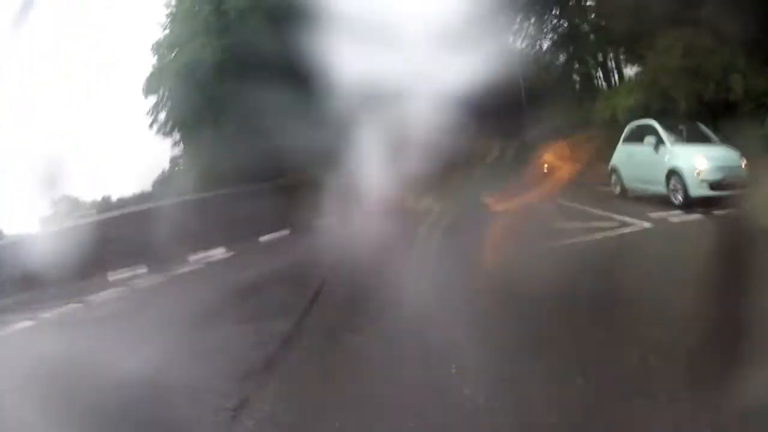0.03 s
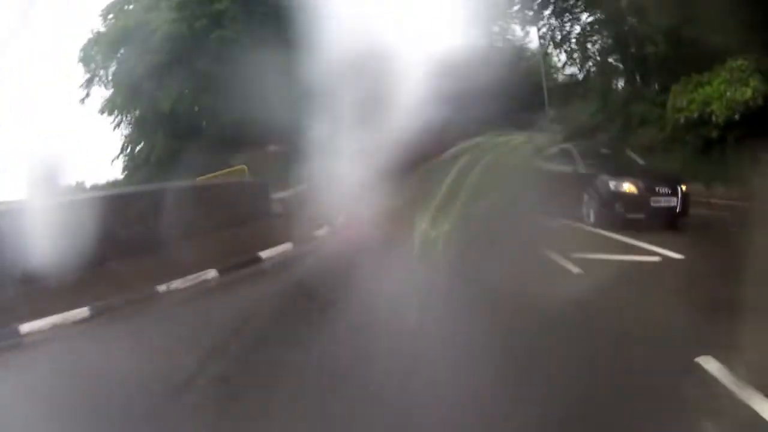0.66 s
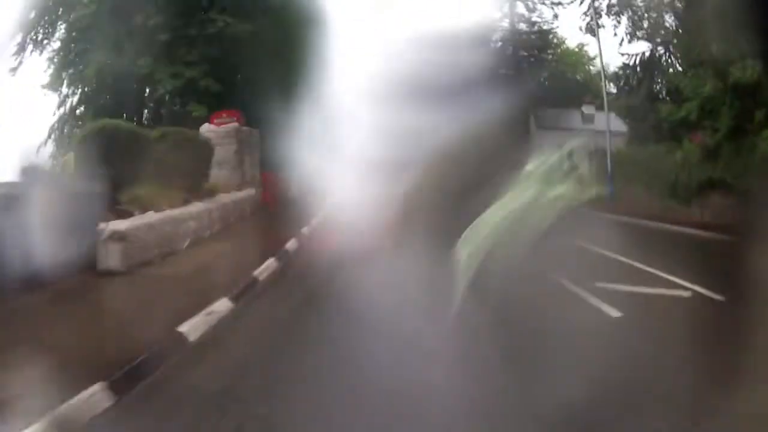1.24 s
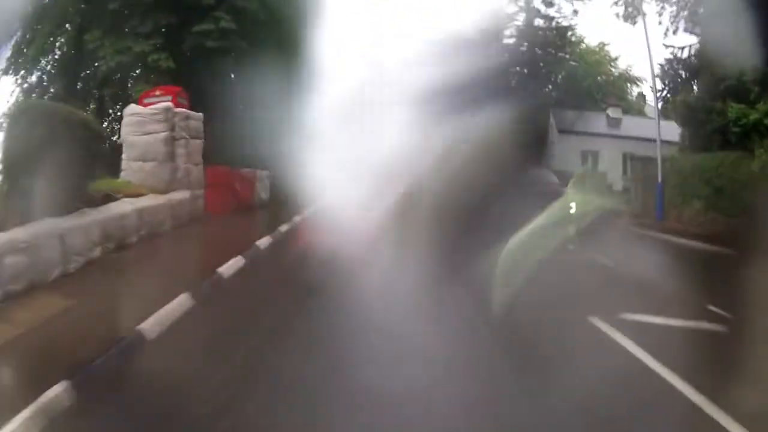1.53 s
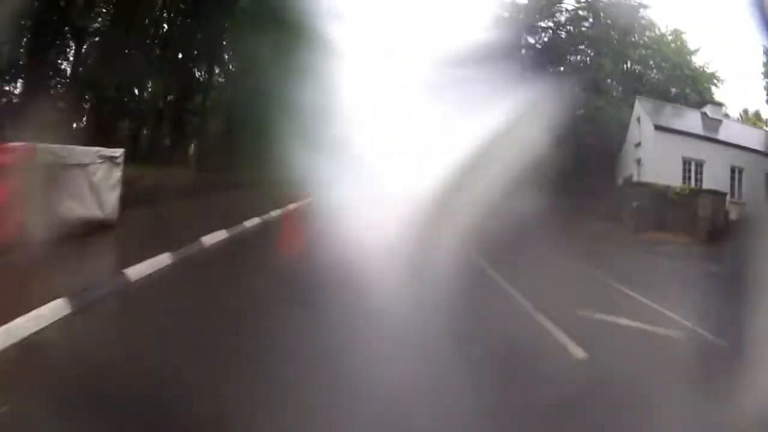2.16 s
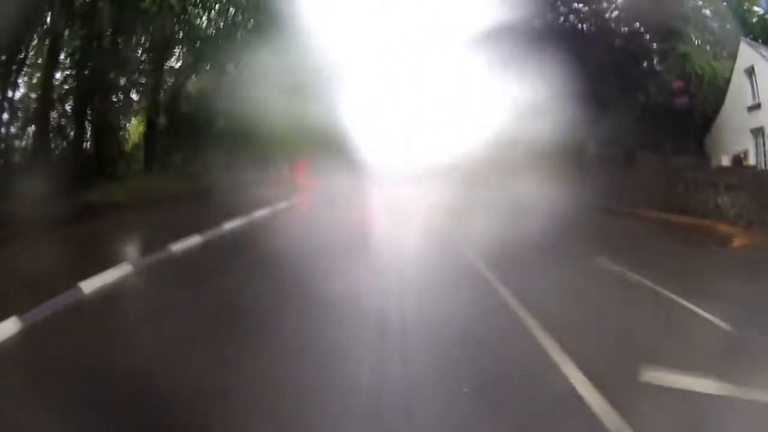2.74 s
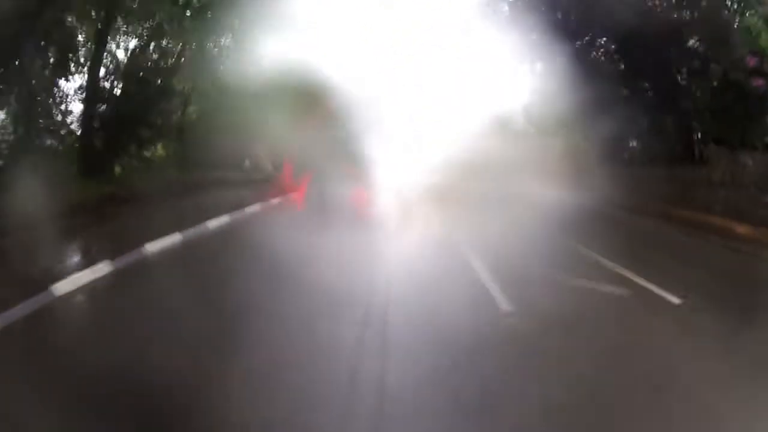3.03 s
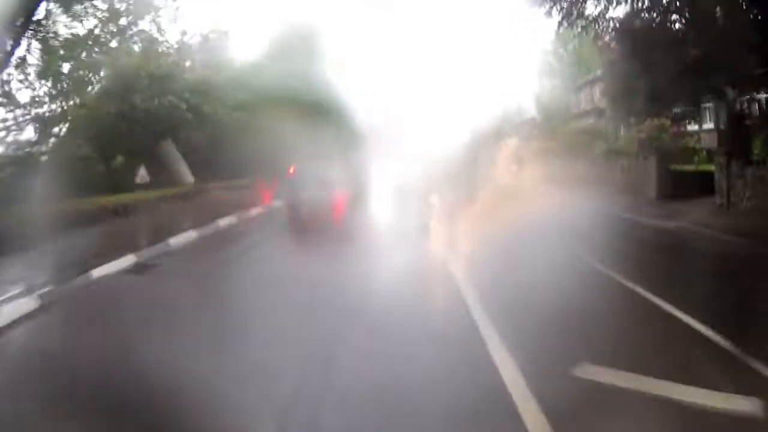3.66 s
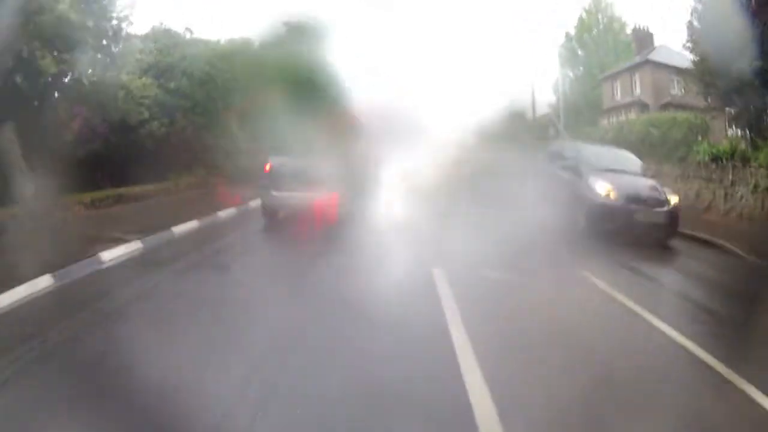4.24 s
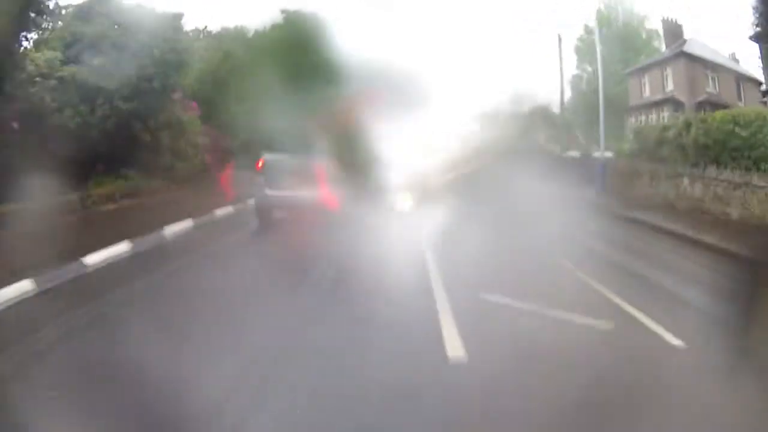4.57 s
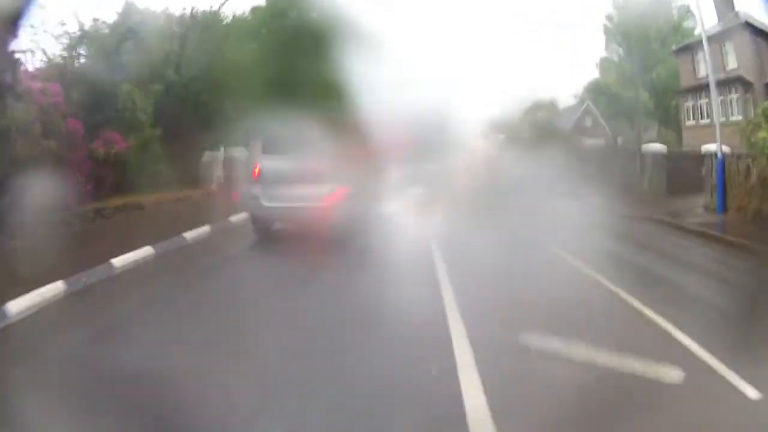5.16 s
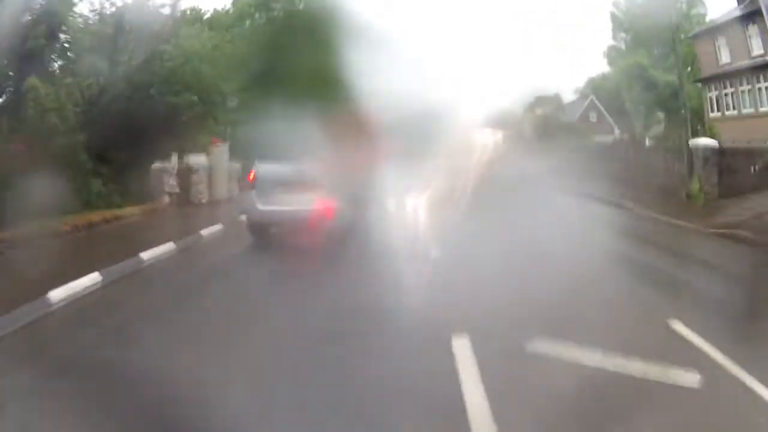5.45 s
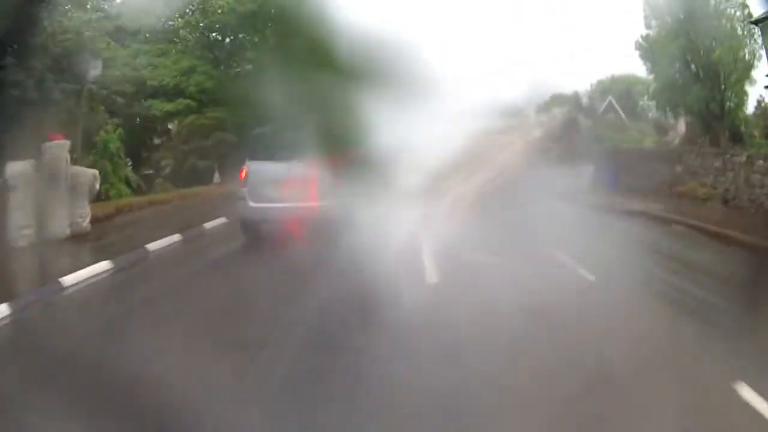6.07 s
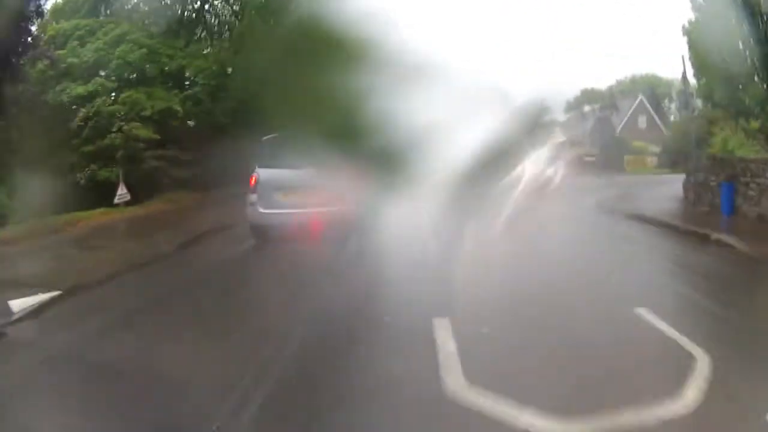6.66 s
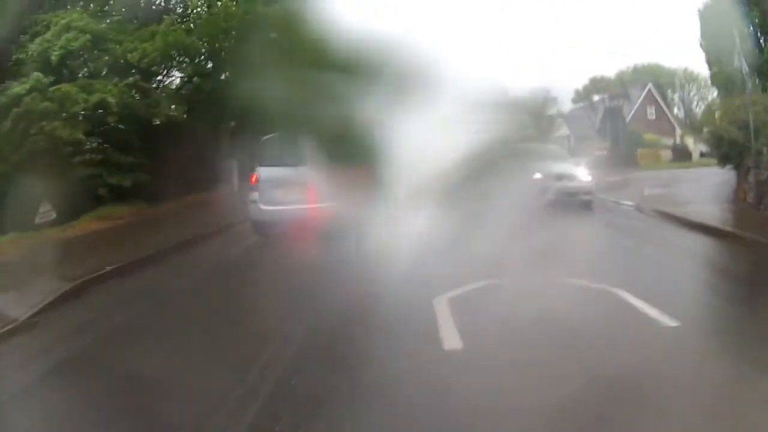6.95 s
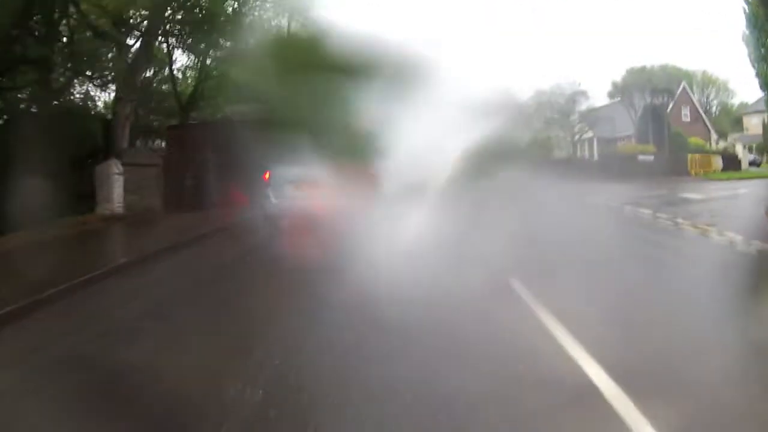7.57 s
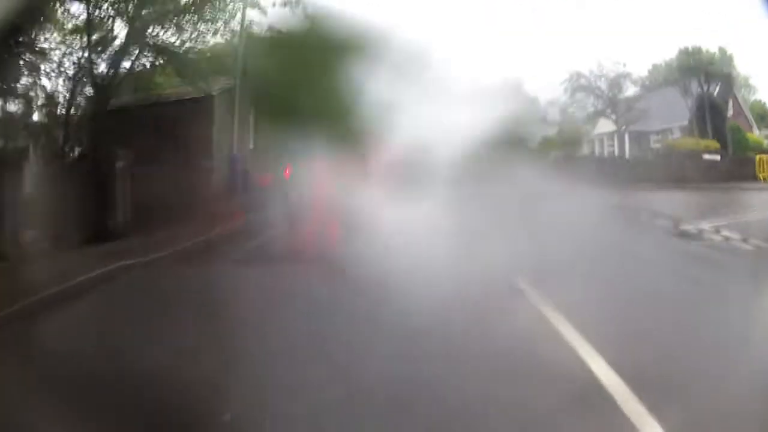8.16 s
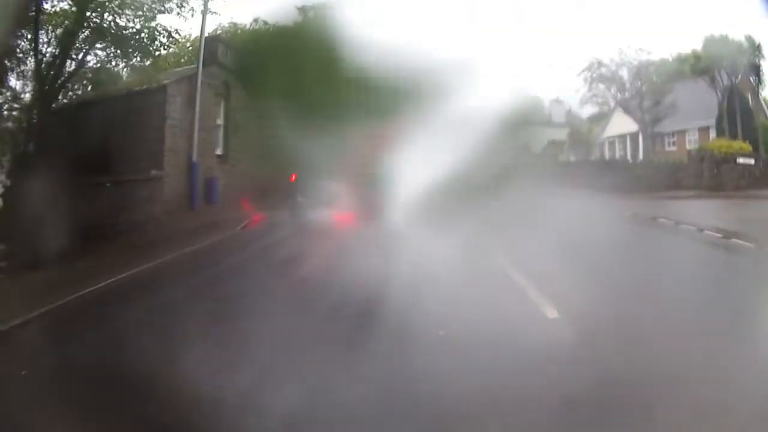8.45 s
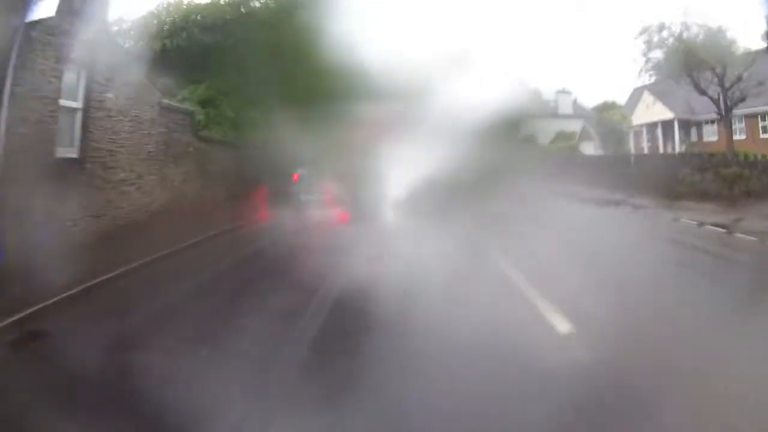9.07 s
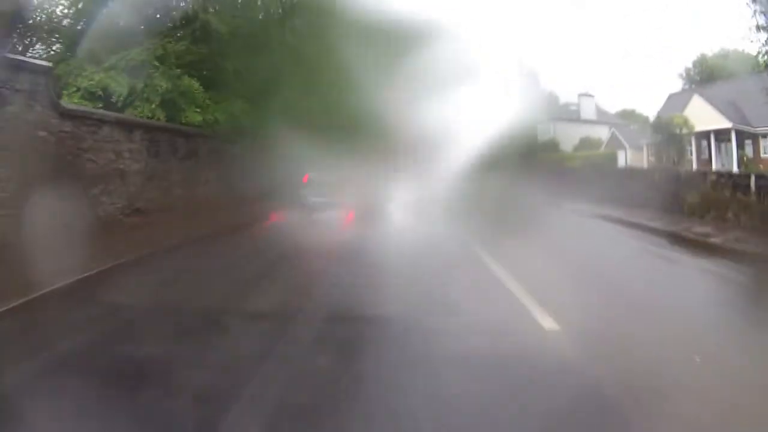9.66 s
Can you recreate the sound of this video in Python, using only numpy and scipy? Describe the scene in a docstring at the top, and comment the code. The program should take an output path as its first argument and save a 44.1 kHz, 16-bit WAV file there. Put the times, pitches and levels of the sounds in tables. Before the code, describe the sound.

A small single-cylinder motorcycle pulls hard with a rising, rasping note, changes up, coasts with a stumbling exhaust and settles into a low steady drone. The microphone is mounted on the bike. Plastic bodywork rattles and knocks over bumps, raindrops tap close by, and one fat drop pops loudly at the gear change. Wind rumbles underneath while oncoming cars hiss past on the wet road.

```python
"""A small four-stroke single-cylinder motorcycle on a wet road, heard from a camera mounted on the bike.
It pulls hard with a rasping intake, changes up, coasts with a stumbling exhaust and settles to a cruise.
Gas pulses boom in the pipe, intake strokes ring the airbox, valves clatter, thin whines follow the revs.
Plastic bodywork rattles over bumps, rain taps the camera case and one fat drop hits the microphone port.
Wind rumbles underneath and oncoming cars hiss by."""
import sys
import numpy as np
from scipy import signal
from scipy.fft import rfft, irfft
from scipy.io import wavfile
from scipy.ndimage import uniform_filter1d

SR = 44100
rng = np.random.default_rng(int(sys.argv[2]) if len(sys.argv) > 2 else 0)


def transcribe(signal):
    """Save signal, clipped to [-1, 1], as a 16-bit WAV file at the path in sys.argv[1]."""
    frames = np.atleast_2d(signal).T
    limited = np.clip(frames, -1, 1)
    pcm = np.round(limited * 32767).astype(np.int16)
    wavfile.write(sys.argv[1], SR, pcm)


N = 437031
T = np.arange(N) / SR

# tone of a drop striking the camera case: freq_hz, level_db
CASE_TONE = [(600, -16), (2500, -4), (4500, -5), (7000, -14), (14000, -33.5)]


def undb(db):
    """Decibels to gain."""
    return 10 ** (np.asarray(db) / 20)


def curve(rows):
    """Rows of (time_s, value) joined by straight lines."""
    return np.interp(T, *np.transpose(rows))


def unit(x):
    """Scale to rms 1."""
    return x / np.sqrt(np.mean(x ** 2))


def running_rms(x, size=12000):
    """Level over a sliding window."""
    return np.sqrt(uniform_filter1d(x ** 2, size))


def steady(x):
    """Hold the running rms near 1."""
    return x / running_rms(x)


def noise():
    """White noise."""
    return rng.standard_normal(N)


def walk(rate_hz):
    """Smooth random drift with rms 1."""
    hold = int(SR / rate_hz)
    steps = noise()[np.arange(N) // hold]
    return unit(uniform_filter1d(uniform_filter1d(steps, hold), hold))


def band(x, hz, kind):
    """Gentle Butterworth filter."""
    return signal.sosfilt(signal.butter(2, hz, kind, fs=SR, output="sos"), x)


def resonate(x, hz, width_hz):
    """Ring x through one resonance."""
    return signal.lfilter(*signal.iirpeak(hz, hz / width_hz, fs=SR), x)


def colour(x, points, size=8192):
    """Ring x through a causal, unit-energy response shaped by (freq_hz, level_db) points."""
    hz, db = np.transpose(points)
    bins = np.maximum(np.arange(size // 2 + 1) * SR / size, 1)
    gain = undb(np.interp(np.log(bins), np.log(hz), db))
    outside = np.abs(np.log(bins / np.clip(bins, hz[0], hz[-1])))
    cepstrum = irfft(np.log(gain) - 2 * outside)  # 12 dB an octave off either end
    cepstrum[0], cepstrum[size // 2:] = 0, 0
    response = irfft(np.exp(rfft(2 * cepstrum)))  # minimum phase
    return signal.fftconvolve(x, response / np.linalg.norm(response))[:N]


def clicks(times, sizes):
    """One impulse at each time, shared between neighbouring samples."""
    at = np.clip(times * SR, 0, N - 1)
    i, part = at.astype(int), at % 1
    return (np.bincount(i, sizes * (1 - part), N + 1) + np.bincount(i + 1, sizes * part, N + 1))[:N]


def revs(firing_hz, cruise_hz=37):
    """Engine speed in octaves above cruising."""
    return np.log2(firing_hz / cruise_hz)


def racing(firing_hz, from_hz=42, full_hz=55):
    """0 at cruising revs, 1 at high revs."""
    return np.clip((firing_hz - from_hz) / (full_hz - from_hz), 0, 1)


def load(throttle):
    """0 up to a cruising throttle, 1 wide open."""
    return np.clip(2 * throttle - 1, 0, 1)


def exhaust(starts, firing_hz, throttle, stumble_db=-11, stumble_s=0.0099, dip_s=0.06):
    """Two gas pulses a cycle, one per crank turn, boom in the pipe; a shut throttle makes them uneven."""
    # pipe tone with the throttle shut, cruising and wide open: freq_hz, level_db
    pipe_shut = [(30, -26.5), (80, -13), (104, -10), (130, -0.5), (172, 0), (205, -6), (260, -19),
                 (340, -20), (500, -29), (900, -43)]
    pipe_cruise = [(30, -23.5), (72, 0), (108, -0.5), (150, 0.5), (185, 5), (225, -4), (262, -6.5),
                   (295, -14.5), (335, -3.5), (375, -9), (408, -12), (445, -28), (485, -18), (525, -14),
                   (620, -35), (745, -26.5), (900, -43.5)]
    pipe_open = [(30, -44), (55, 8), (67, 9), (112, 12.5), (132, 9), (165, 6.5), (190, 17), (222, 8.5),
                 (252, 9.5), (280, 5.5), (312, -12), (335, -1.5), (400, -23), (900, -39.5)]
    # moments when a pulse all but fails while coasting: time_s
    stumbles = [3.892, 4.083, 4.196, 4.351, 4.47, 4.607, 4.799, 5.108, 5.248]
    # the drone ducks as the gear change unloads the drive: time_s, gain_db
    shift_dips = [(2.44, -6.5), (2.72, -2.5)]
    period = np.interp(starts, T, 1 / firing_hz)
    times = np.r_[starts, starts + 0.4868 * period]
    size_luck, time_luck = rng.standard_normal((len(times), 2)).T
    shut = np.clip(1 - 2 * np.interp(times, T, throttle), 0, 1) ** 2
    scatter_db, jitter_s = 0.6 + 2.2 * shut, 0.000025 + 0.0001 * shut
    failing = np.exp(-((times[:, None] - np.array(stumbles)) / stumble_s) ** 4).sum(axis=1)
    sizes = np.repeat([1, 0.65], len(starts)) * undb(scatter_db * size_luck + stumble_db * failing)
    pulses = clicks(times + jitter_s * time_luck, sizes)
    pipes = pipe_shut, pipe_cruise, pipe_open
    crossfade = np.clip(1 - np.abs(2 * throttle - np.arange(3)[:, None]), 0, 1)
    boom = steady(sum(share * unit(colour(pulses, pipe)) for share, pipe in zip(crossfade, pipes)))
    # off load the pressure wave steepens: deep narrow troughs, rounded crests
    boom -= 0.15 * (1 - load(throttle)) * band(boom ** 2, 70, "highpass")
    duck_db = sum(db * np.exp(-((T - at) / dip_s) ** 2) for at, db in shift_dips)
    return steady(boom) * undb(-25.5 + 3.5 * revs(firing_hz) + 6.5 * load(throttle) + duck_db)


def intake(starts, phase, firing_hz, throttle, lag_s=0.00049, tuned_hz=61.9, tuned_width_hz=2.5):
    """Each intake stroke sucks a bark and a rush of air through the airbox; more flow, more rasp."""
    # airbox resonances: pitch_hz, width_hz, level_db, in_tune_extra_db, eased_throttle_extra_db
    airbox = [(366, 44, 4, 1, 3.5), (505, 109, 3, 1.5, 0), (618, 39, 3.5, 0.5, -1),
              (718, 34.5, 0.5, 6, -0.5), (1102, 77, 0, 3, 1.5), (1235.6, 21, 4, 3, 0), (1393, 80, 1, 4, -4),
              (1502, 44, 2.5, 5, -9), (1587, 58, -0.5, 7, -3.5), (1790, 190, -7.5, 3.5, -1.5),
              (2370, 200, -9, -0.5, 1)]
    jitter_s = 0.00002 * rng.standard_normal(len(starts))
    bark = unit(clicks(starts + lag_s + jitter_s, undb(0.68 * rng.standard_normal(len(starts)))))
    valve_open = np.exp(-((phase - 0.22) % 1) / 0.3)
    rush = band(unit(noise() * valve_open), 1400, "highpass")
    flow = band(bark + undb(-19) * rush, [230, 2900], "bandpass")
    # the rasp swells where the revs bring the intake tract into tune
    in_tune = np.exp(-((firing_hz - tuned_hz) / tuned_width_hz) ** 2)
    # at high revs the pressure wave steepens and favours the upper resonances
    tilt_db_per_octave = np.maximum(0.1 * (firing_hz - 57), -4.5)
    eased = 1 - load(throttle)
    plain, rasp = 0, 0
    for k, (hz, width_hz, db, tuned_db, eased_db) in enumerate(airbox):
        gain = undb(db + tilt_db_per_octave * np.log2(hz / 505))
        ring = (-1) ** k * gain * resonate(flow, hz, width_hz)  # neighbours swing in opposite senses
        plain += ring
        rasp += undb(tuned_db * in_tune + eased_db * eased) * ring
    breath = (throttle * firing_hz / 32.2) ** 7.35  # dies away steeply at low air flow
    return rasp / running_rms(plain) * undb(-23) * np.sqrt(breath / (1 + breath))


def valve_gear(phase, firing_hz, flicker_db=1.66, scatter_db=2.5, db_per_octave=5):
    """Valves and chain hiss, throbbing with the four strokes; high revs add two hard clacks a cycle."""
    # tone of the metallic hiss and of the clacks: freq_hz, level_db
    hiss_tone = [(290, -52), (500, -24), (610, -12.5), (674, -13), (760, -10), (935, -10.5), (1030, -7),
                 (1140, -7.5), (1230, -11.5), (1580, -9), (1880, -9.5), (2800, -1.5), (4540, -20.5),
                 (5700, -30.5), (6900, -41), (8500, -51), (15000, -79.5)]
    clack_tone = [(500, -27.5), (1100, -16.5), (1700, -7.5), (2100, -4), (2500, -0.5), (3000, -2),
                  (3700, -15.5), (4600, -21.5), (5700, -32.5), (6900, -41.5), (8500, -49.5), (15000, -75)]
    # clacks within one engine cycle: position_cycles, width_cycles, strength
    beats = [(.33, 0.083, 1.07), (.81, .06, 0.87)]
    throb_db = 3 * np.cos(4 * 2 * np.pi * phase) + np.cos(2 * np.pi * (phase - 0.08))
    hiss = unit(colour(noise() * undb(throb_db + flicker_db * walk(70)), hiss_tone)) * undb(-35.5)
    cycle = phase.astype(int)
    forces = undb(scatter_db * rng.standard_normal((cycle[-1] + 1, len(beats))))[cycle].T
    blows = sum(strength * force * np.exp(-((phase % 1 - at) / width) ** 2)
                for force, (at, width, strength) in zip(forces, beats))
    clacks = unit(colour(noise() * (0.4 + blows), clack_tone)) * undb(-33) * np.sqrt(racing(firing_hz))
    return (hiss + clacks) * undb(db_per_octave * revs(firing_hz))


def cruise_buzz_and_whine(phase, throttle, waver_db=2.5, wander_rad=0.65, throttle_width=0.22):
    """A faint intake buzz near 520 Hz at cruise, with thin higher whines following the crank."""
    # partials of the buzz, then the whines: firing_rate_multiple, loudest_at_throttle, level_db
    partials = [(13, .6, -55), (14, .52, -49), (15, .5, -53), (20, 0.36, -57), (26, .33, -57.5),
                (28, .08, -59), (40, 0.35, -52.5), (48, 0.7, -44.5)]
    tones = np.zeros(N)
    for multiple, best, db in partials:
        gain = undb(db + waver_db * walk(6)) * np.exp(-((throttle - best) / throttle_width) ** 2)
        tones += gain * np.sqrt(2) * np.sin(2 * np.pi * multiple * phase + wander_rad * walk(7.4))
    return tones


def sizzle(firing_hz, spread_db=6.5, flurry_db=4, count=800):
    """Fine spray ticks on the case in flurries while the engine revs high."""
    # tone of the ticks: freq_hz, level_db
    tick_tone = [(3000, 2), (5500, 1.5), (6800, -2), (8500, -17), (11000, -22), (13500, -19), (15000, -27)]
    when, luck = rng.random((count, 2)).T
    ticks = clicks(when * N / SR, undb(-spread_db * np.log(np.maximum(luck, 0.02))))
    flurries = ticks * undb(flurry_db * walk(16))
    return unit(colour(flurries, tick_tone)) * undb(-63) * racing(firing_hz)


def wind():
    """Wind rumbles on the case, easing as the bike coasts and returning as it picks up."""
    # tone of the rumble: freq_hz, level_db
    rumble_tone = [(20, -27), (45, -15), (85, -13.5), (108, -6), (140, -5.5), (170, -2), (220, -8),
                   (265, -10), (320, -14), (450, -18.5), (1000, -33), (3000, -58.5)]
    # strength of the wind: time_s, level_db
    strength = [(0, -22.5), (1, -28.5), (2.1, -27), (3.1, -25.5), (4.1, -30.5), (5.3, -30.5), (6.6, -34.5),
                (7.8, -29.5), (9, -30), (9.9, -29.5)]
    return unit(colour(noise(), rumble_tone)) * undb(curve(strength))


def tyre_hiss(own_spray_db=-55.5):
    """Wet tyres hiss: the bike's own steady spray under swells that fall off with distance."""
    # tone of the spray: freq_hz, level_db
    spray_tone = [(600, -14.5), (1200, -1), (2800, 1), (4500, -0.5), (5900, -15), (6900, -19.5),
                  (8200, -34.5), (11000, -48), (15000, -57.5)]
    # swells from oncoming cars or off a near wall: nearest_s, level_db, half_length_s
    swells = [(4.576, -39.5, 0.2), (6.71, -43, 0.57), (7.44, -34.5, 0.15), (8.698, -45, 0.19)]
    passing_power = sum(undb(db) ** 2 / (1 + ((T - at) / half) ** 2) for at, db, half in swells)
    return colour(noise(), spray_tone) * np.sqrt(undb(own_spray_db) ** 2 + passing_power)


def rain(ring_s=0.0006, spread_db=4, count=130):
    """Drops strike the case and ring for an instant; finer ones patter between them."""
    # the larger drops: start_s, level_db, pitch_hz
    drops = [(2.772, -25, 4800), (5.751, -42, 6000), (6.028, -14, 2700), (6.644, -24, 4070),
             (8.276, -24, 2900), (9.888, -19.5, 4600)]
    taps = np.zeros(N)
    for start, db, hz in drops:
        age = np.maximum(T - start, 0)
        envelope = age / ring_s * np.exp(1 - 1.1 * age / ring_s)
        taps -= undb(db) * envelope * np.sin(2 * np.pi * hz * age)
    when, luck = rng.random((count, 2)).T
    sizes = undb(-44 - spread_db * np.log(np.maximum(luck, 0.03)))
    return taps + colour(clicks(when * N / SR, sizes), CASE_TONE)


def panel_contact(gap_s=0.011, decay_s=0.0038, range_db=7, scrape=0.16, count=2000):
    """Envelope of a loose panel on its mount: an uneven run of short bounces over a light scrape."""
    gaps, luck = rng.random((count, 2)).T
    times = np.cumsum(gap_s * (0.5 + gaps))
    last = np.maximum(np.searchsorted(times, T) - 1, 0)
    force = undb(range_db * (luck[last] - 1))
    return unit(scrape + force * np.exp(-np.abs(T - times[last]) / decay_s))


def bodywork(attack_s=0.015, release_s=0.047, knock_rise_s=0.0008, ring_hz=2330, sing_db=-30.5):
    """Loose plastic sings under a light shake, crackles under a hard one and knocks over bumps."""
    # tone of the plastic panels: freq_hz, level_db
    panel_tone = [(260, -32), (450, -9), (535, -7.5), (609, -11.5), (812, -7.5), (937, -8.5), (1150, -5),
                  (1510, -5.5), (2000, -3), (2460, 1.5), (2800, -5.5), (3090, -5), (4830, -19.5),
                  (6080, -37), (14000, -99.5)]
    # rough stretches of road that shake them: start_s, length_s, level_db
    rough_road = [(0.876, 0.017, -24), (1.518, 0.034, -24.5), (2.312, 0.022, -21.5), (2.844, 0.13, -24.5),
                  (3.04, 0.036, -36.5), (3.15, 0.052, -31.5), (3.995, 0.072, -37.5), (4.726, 0.026, -35),
                  (6.787, 0.02, -41), (7.056, 0.1, -31.5), (7.16, 0.043, -30.5), (7.6, 0.15, -30),
                  (8.399, 0.016, -32), (8.79, 0.07, -32), (8.917, 0.24, -28.5), (9.233, 0.066, -34),
                  (9.483, 0.079, -28)]
    # their hardest knocks: start_s, level_db, decay_s
    knocks = [(0.155, -23, 0.0044), (0.607, -23, 0.0042), (0.902, -15, 0.014), (1.086, -24, .008),
              (1.1, -24, .008), (1.531, -19.5, 0.012), (1.564, -18, 0.015), (1.582, -17, 0.011),
              (1.772, -19, 0.0099), (2.136, -12.5, 0.0085), (2.204, -17, 0.02), (2.315, -17, .006),
              (2.324, -17, 0.0096), (2.346, -13.5, 0.0073), (2.653, -19, .005), (2.718, -22.5, 0.0076),
              (2.817, -22.5, 0.02), (2.859, -18.5, 0.014), (2.894, -21, 0.0091), (2.926, -24, 0.019),
              (2.958, -22, .009), (2.989, -22, 0.0065), (2.997, -15.5, 0.0084), (3.044, -24, .012),
              (3.071, -23, 0.011), (3.121, -22, .005), (3.14, -21, 0.013), (3.165, -16, 0.0058),
              (4.052, -23, 0.008), (4.752, -22.5, 0.012), (5.168, -27, 0.0044), (5.241, -27, 0.0051),
              (5.47, -26.5, 0.0051), (6.768, -21.5, 0.0043), (6.793, -26, .007), (6.805, -23.5, .007),
              (6.834, -22, 0.0048), (7.052, -27, .009), (7.078, -29, .005), (7.105, -23, .006),
              (7.165, -26, 0.0073), (7.175, -21, 0.0066), (7.201, -21, .006), (7.208, -19, .008),
              (7.243, -22.5, 0.0047), (7.624, -22, 0.0056), (7.633, -23, 0.011), (7.658, -24, 0.0054),
              (7.675, -21, 0.014), (7.735, -18, 0.0097), (7.767, -23, 0.0069), (7.825, -23, 0.0095),
              (8.183, -23.5, 0.0084), (8.255, -23, 0.0058), (8.279, -24, 0.0077), (8.385, -19, 0.0097),
              (8.418, -20.5, 0.017), (8.774, -25, 0.0045), (8.89, -22, 0.0059), (8.916, -20, 0.0052),
              (8.955, -22, 0.017), (9.035, -20.5, 0.013), (9.072, -22, 0.0071), (9.119, -16, 0.0051),
              (9.133, -20, 0.0046), (9.152, -18.5, .01), (9.177, -16.5, 0.0089), (9.197, -19, 0.0056),
              (9.317, -19, 0.011), (9.466, -18, 0.0045), (9.503, -17, .005), (9.517, -15, .005),
              (9.526, -18, 0.014), (9.707, -19.5, 0.0075)]
    shake, hits, rings = np.zeros((3, N))
    for start, length, db in rough_road:
        onset = np.clip((T - start) / attack_s + 0.5, 0, 1)
        shake += undb(db) * onset * np.exp(-np.maximum(T - start - length, 0) / release_s)
    contact = panel_contact()
    chatter, buzz, crack = contact * noise(), contact * noise(), noise()
    sing = unit(colour(resonate(chatter, 2060, width_hz=480), panel_tone))
    sing *= undb(sing_db) * np.tanh(shake / undb(sing_db))  # levels off as the shake grows
    age = T[:SR // 10]
    attack = 1 - np.exp(-age / knock_rise_s)
    for start, db, decay in knocks:
        span = int(start * SR) + np.arange(len(age))
        hz = ring_hz * np.exp(0.1 * rng.standard_normal())
        hits[span] += undb(db + 1.27) * attack * np.exp(-(age / decay) ** 2)
        rings[span] += undb(db - 8) * attack * np.exp(-age / decay) * np.sin(2 * np.pi * hz * age)
    return colour(buzz * shake * undb(0.2) + hits * crack, panel_tone) + sing + rings


def port_hit(start_s=2.4003, decay_s=0.002):
    """A fat drop lands on the microphone port: a splash and a loud, choked ring."""
    # resonances of the port: pitch_hz, level_db
    modes = [(400, 0), (950, -1), (1600, -5), (2240, 0.5), (5100, -12.5), (6400, -19)]
    age = np.maximum(T - start_s, 0)
    ring = sum(undb(db) * np.sin(2 * np.pi * hz * age) for hz, db in modes)
    splash = undb(-12) * colour(noise(), CASE_TONE)
    return (splash - ring) * 2 * age / decay_s * np.exp(-(age / decay_s) ** 2)


def car_swish(nearest_s=7.48, level_db=-48, rise_s=0.2, fall_s=0.065):
    """The closest car throws a bright spray that builds as it nears and drops away fast."""
    # tone of the swish: freq_hz, level_db
    swish_tone = [(2000, -12), (4000, -4.5), (4900, 0), (5900, -15.5), (7000, -19.5), (8200, -23),
                  (11000, -36.5), (15000, -55.5)]
    width_s = np.where(T < nearest_s, rise_s, fall_s)
    return colour(noise(), swish_tone) * undb(level_db) / (1 + ((T - nearest_s) / width_s) ** 2)


def scene():
    """The ride in mono. The crank times every engine sound: one firing for two turns."""
    # a climb in the low gear, the change up, then a long settling: time_s, firing_hz
    firing_rate = [(0.0, 51.84), (0.19, 52.19), (0.41, 53.7), (1.07, 58.44), (1.65, 62.37), (1.89, 63.61),
                   (2.37, 66.33), (2.63, 59.04), (2.74, 43.3), (2.9, 46.02), (3.63, 44.63), (3.91, 41.21),
                   (4.05, 43.44), (4.43, 41.14), (5.31, 39.75), (5.91, 38.15), (6.99, 37.07), (8.58, 36.69),
                   (9.91, 38.14)]
    # the rider's throttle: time_s, opening (0 shut, 0.5 cruising, 1 wide open)
    throttle_moves = [(0, 0.56), (.3, 0.67), (.55, 1), (2.33, 0.83), (2.41, 0.3), (2.47, 0.5), (2.62, 0.49),
                      (2.75, 0.47), (3.3, .14), (5.2, 0.075), (6.0, 0.25), (7.0, 0.46), (8.6, 0.47),
                      (9.3, 0.64), (9.9, 0.55)]
    firing_hz, throttle = curve(firing_rate), curve(throttle_moves)
    phase = np.cumsum(firing_hz) / SR  # in engine cycles
    starts = np.interp(np.arange(int(phase[-1]) + 1), phase, T)
    engine = exhaust(starts, firing_hz, throttle) + intake(starts, phase, firing_hz, throttle)
    engine += valve_gear(phase, firing_hz) + cruise_buzz_and_whine(phase, throttle)
    rattle = bodywork()
    water = rain() + port_hit() + sizzle(firing_hz)
    return (engine + rattle + water + wind() + tyre_hiss() + car_swish())[None]


def record(dry, knee=7, top_hz=15300):
    """The camera rounds off peaks near full scale and cuts the top."""
    rounded = dry / (1 + np.abs(dry) ** knee) ** (1 / knee)
    return signal.sosfilt(signal.ellip(8, 0.2, 70, top_hz, fs=SR, output="sos"), rounded)


dry = scene()
out = record(dry)
transcribe(out)
```